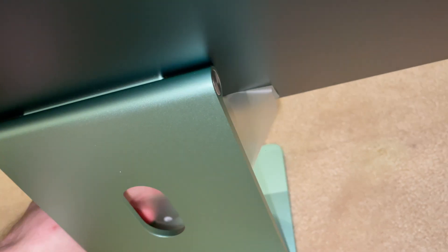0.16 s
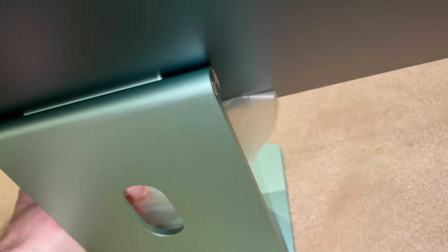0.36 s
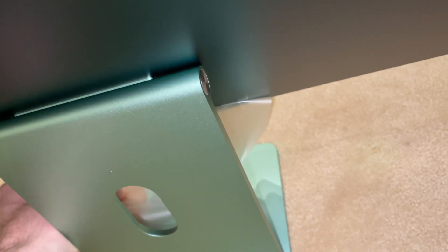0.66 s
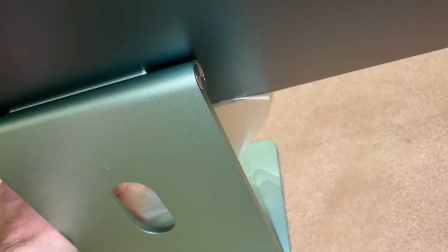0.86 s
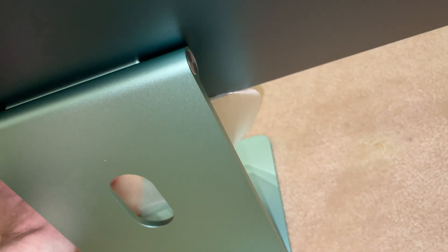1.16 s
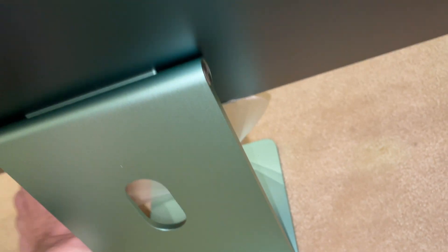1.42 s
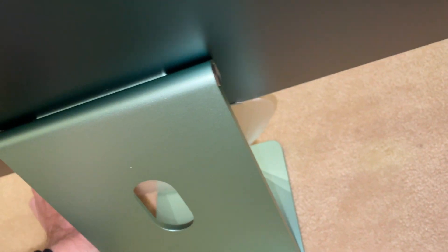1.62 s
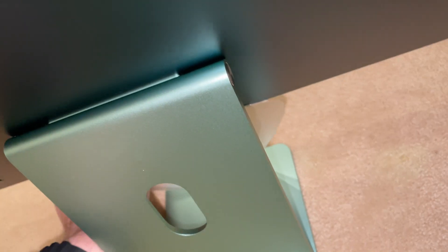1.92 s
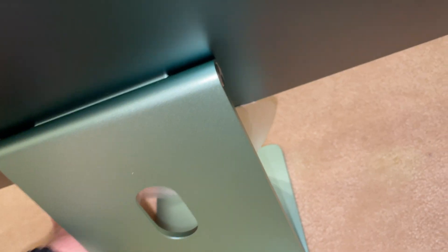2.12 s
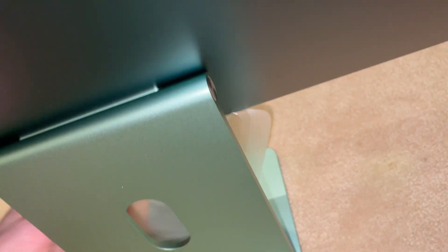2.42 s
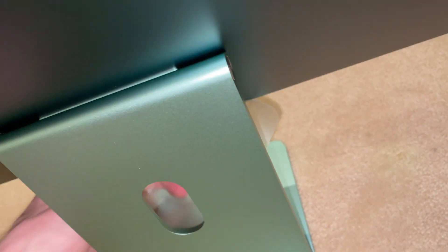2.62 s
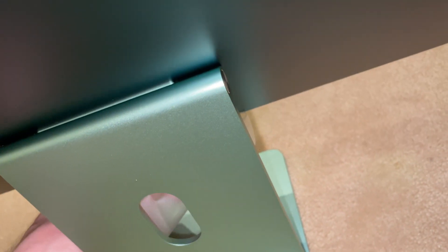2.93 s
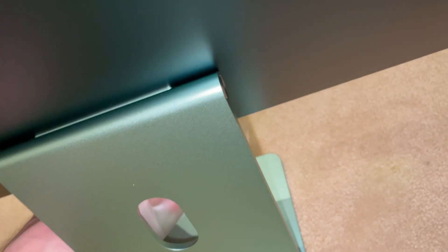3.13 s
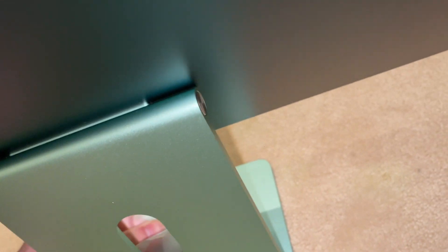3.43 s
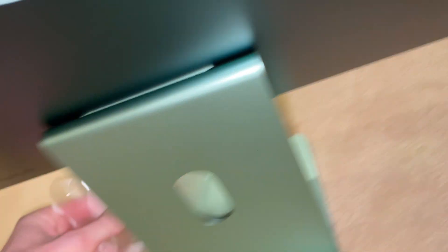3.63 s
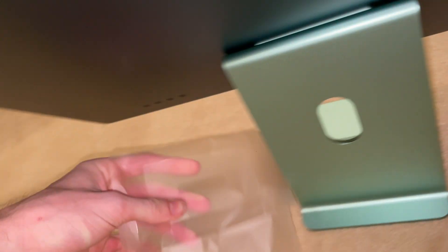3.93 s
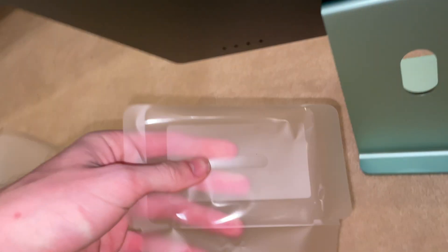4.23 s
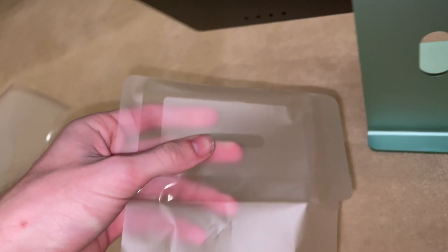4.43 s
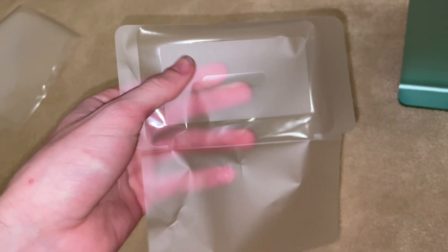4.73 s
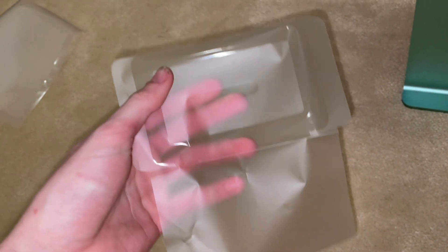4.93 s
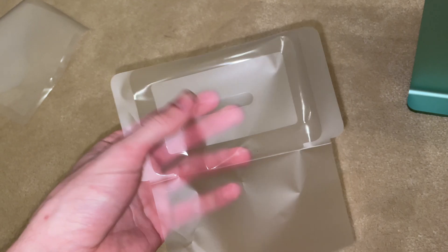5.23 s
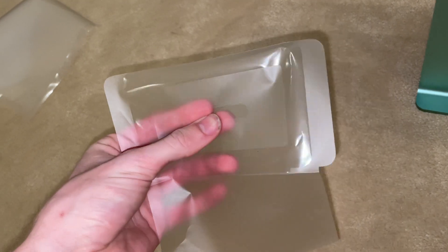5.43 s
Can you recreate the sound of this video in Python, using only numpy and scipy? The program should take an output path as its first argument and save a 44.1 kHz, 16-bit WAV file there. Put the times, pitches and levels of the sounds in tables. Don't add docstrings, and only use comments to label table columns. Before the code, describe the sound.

Very close stereo pickup in a quiet indoor room: stiff thin plastic film is worked off a metal stand by hand. Brittle snaps, fine crackle and hollow buckling pops come in uneven clusters, with soft low thuds from the tugged stand. The peel intensifies after two and a half seconds, peaks as the film rips free just after three, then thins to light crinkles and near silence, with a few late ticks.

```python
import sys
import numpy as np
from scipy import signal
from scipy.fft import rfft, irfft, next_fast_len
from scipy.io import wavfile

SR = 44100
rng = np.random.default_rng(int(sys.argv[2]) if len(sys.argv) > 2 else 0)


def materialize(psi):
    bounded = np.clip(np.atleast_2d(psi).T, -1, 1)
    quanta = np.round(bounded * 32767).astype(np.int16)
    wavfile.write(sys.argv[1], SR, quanta)


def voltage_ratio(level):
    return 10 ** (np.asarray(level, float) / 20)


N = 245195
SIZE = next_fast_len(N + SR // 2)
HZ = np.arange(SIZE // 2 + 1) * SR / SIZE
SECONDS = np.arange(N) / SR
RELEASE_S = 3.168

# start_s [s], peak_db [dB], top_share_db [dB], ring_hz [Hz]
SNAPS = [(0.0838, -26, -12.5, 3270), (0.1172, -22.5, -3, 3420), (0.1213, -19, 4, 2760),
         (0.1307, -22, 3, 3600), (0.147, -21.5, 4, 3720), (0.2112, -29, 3, 3450), (0.2468, -25.5, 1, 6100),
         (0.5231, -28.5, 1, 2400), (0.6277, -25.5, -19, 4440), (0.6721, -29.5, -6, 2120),
         (0.8476, -36, -33, 2420), (1.1645, -23, -5, 5900), (1.347, -25.5, 8.5, 6670),
         (1.3955, -39, 6.5, 7200), (1.409, -30.5, -3.5, 2280), (1.7163, -41, -17, 2010),
         (1.845, -22, -5.5, 2500), (1.9052, -12.5, 0, 4320), (2.0315, -30.5, 2.5, 3180),
         (2.0555, -26.5, 0, 4800), (1.184, -41, -37, 2070), (2.097, -38, 7, 1930),
         (2.1414, -25.5, -1, 2450), (2.1485, -22.5, -2, 3950), (2.1668, -15, 6, 3800),
         (2.2088, -26, -4, 3400), (2.2931, -32.5, -25, 3700), (2.3153, -24, -11.5, 3780),
         (2.486, -28.5, -28, 2570), (1.4917, -50, -38, 2350)]
# start_s [s], peak_db [dB], top_share_db [dB], ring_hz [Hz]
RIPS = [(2.5437, -29, -0.5, 3117), (2.6, -32.5, -12.5, 4300), (2.572, -29.5, 3.5, 2474),
        (2.5966, -14.5, -6.5, 3700), (2.628, -26.5, -19, 2520), (2.64, -20.5, 2, 6580),
        (2.652, -21, -7, 5590), (2.657, -14.5, -1, 3295), (2.6653, -16, 1.5, 7420),
        (2.677, -19, -2.5, 2900), (2.7133, -25, 1, 3100), (2.7244, -27, -11.5, 3064),
        (2.738, -26.5, -6.5, 2394), (2.7703, -20, 8, 5500), (2.9351, -17, 4, 2494),
        (2.9848, -14.5, -7, 3033), (3.1197, -22.5, -2, 3120), (3.1351, -8.5, 0, 1918),
        (3.1583, -13, 3.5, 3010), (3.1724, -13, -12.5, 4300), (3.1846, -23.5, -16, 5138),
        (3.235, -33, -7.5, 3300), (3.248, -27.5, -4.5, 3172), (3.2684, -29.5, -15, 3270),
        (3.3036, -36.5, -19.5, 2492), (3.336, -35, -3, 3270), (3.36, -33, -6, 2140),
        (2.61, -37.5, -12.5, 5240), (2.758, -25, -16.5, 2514), (3.2004, -31, -13, 3800)]
# start_s [s], peak_db [dB], top_share_db [dB], ring_hz [Hz]
TICKS = [(3.4412, -28.5, -6, 3700), (3.48, -33.5, -33.5, 1840), (3.501, -22.5, -3.5, 2830),
         (3.527, -26.5, -21.5, 3500), (3.5527, -26.5, -1, 2280), (3.6005, -23, -1, 2240),
         (3.626, -30.5, -17.5, 4430), (3.665, -27, -13, 4800), (3.6991, -33, -37, 4000),
         (3.762, -37.5, -18, 3650), (3.8823, -29, -2, 6440), (4.0636, -14.5, -4, 6530),
         (4.178, -49, -3.5, 2760), (4.361, -50, -21, 2195), (4.47, -56, -8.5, 6530),
         (4.5549, -47, -35, 2080), (5.2253, -48, -20, 2280), (5.2704, -49.5, -42, 1417),
         (5.3203, -24.5, -23.5, 4280), (5.3567, -18.5, 1, 3860), (5.4716, -43, -9, 4500),
         (4.335, -46, -39, 2403), (4.965, -69.5, -22, 1800), (5.095, -70, -16, 2080),
         (5.18, -64.5, -25, 2600), (3.587, -29, -5.5, 2010), (3.68, -40, -6, 6400),
         (3.5372, -31, -28.5, 2520)]
# pitch_hz [Hz], level_db [dB per Hz]
FILM = [(800, -23), (1300, 4), (1900, 0.5), (2500, 1), (3800, 0), (4600, -2), (6800, -2), (8300, -6),
        (11500, -8), (13500, -12), (15500, -17.5), (16700, -28.5)]


def rms_one(x):
    return x / np.sqrt(np.mean(x ** 2) + 1e-20)


def colour(x, points):
    hz, db = np.transpose(points)
    log_gain = np.interp(np.log(HZ + 1), np.log(hz), db) * np.log(10) / 20
    cepstrum = irfft(log_gain, SIZE)
    cepstrum[1:SIZE // 2] *= 2
    cepstrum[SIZE // 2 + 1:] = 0
    return irfft(rfft(x, SIZE) * np.exp(rfft(cepstrum)), SIZE)[..., :N]


def drift(rate_hz):
    r = np.exp(-80 * np.pi * rate_hz / SR)
    slow = signal.lfilter([1], [1, -2 * r, r * r], rng.standard_normal(N // 40 + 2002))[2000:]
    return np.interp(np.arange(N) / 40, np.arange(len(slow)), rms_one(slow))


def resonate(x, hz, width_hz):
    r = np.exp(-np.pi * width_hz / SR)
    zeros = np.array([1, 0, -1]) * (1 - r * r) / 2
    return signal.lfilter(zeros, [1, -2 * r * np.cos(2 * np.pi * hz / SR), r * r], x)


def grains(per_s, spread_db, t60_s):
    size_db = spread_db * np.minimum(rng.exponential(1, N), 4)
    impulses = voltage_ratio(size_db) * (rng.random(N) < per_s / SR)
    envelope = signal.lfilter([1], [1, -voltage_ratio(-60 / (t60_s * SR))], impulses)
    return rms_one(envelope * rng.standard_normal(N))


def add(out, s, x):
    i = max(round(s * SR), 0)
    out[i:i + len(x)] += x[:N - i]


def split(x):
    return [signal.sosfilt(signal.butter(4, 7900, kind, fs=SR, output="sos"), x) for kind in ("low", "high")]


def patchy(x, patchy_db):
    edges = 700 * 2 ** np.arange(0, 4.6, .5)
    out = x
    for edge in zip(edges, edges[1:]):
        band = signal.sosfilt(signal.butter(2, edge, "band", fs=SR, output="sos"), x)
        out = out + band * (voltage_ratio(patchy_db * drift(3.0)) - 1)
    return out


def between(low, high):
    return np.clip(np.minimum(HZ - low, high - HZ) / 150 + .5, 0, 1)


def still_room():
    room = [(25, -23), (50, -5), (90, -5.5), (160, -19.5), (300, -24.5), (1000, -40), (16000, -52.5)]
    return voltage_ratio(-66) * rms_one(colour(rng.standard_normal(N), room))


def thuds():
    # start_s [s], peak_db [dB], ring_hz [Hz]
    tugs = [(0.118, -20, 149.5), (0.126, -24.5, 117), (0.26, -28.5, 102.5), (0.349, -30.5, 172),
            (0.468, -28, 78), (0.524, -28, 187), (0.675, -21, 201), (1.059, -43, 118), (1.359, -29.5, 84.6),
            (1.501, -36.5, 86.5), (1.5, -26, 164), (1.729, -31.5, 165), (1.733, -27.5, 91),
            (1.915, -27.5, 105), (2.145, -19, 81), (2.176, -22.5, 180), (2.579, -29, 182),
            (2.633, -19.5, 180), (2.663, -23, 181), (2.835, -29, 176), (2.94, -17.5, 228),
            (3.135, -11.5, 260), (3.161, -10, 373), (3.166, -11.5, 175), (3.173, -17, 98.5),
            (3.669, -31.5, 200), (3.893, -42, 95.6), (4.075, -34.5, 119), (4.521, -45, 84),
            (0.689, -29.5, 195), (0.565, -41, 62), (0.53, -30, 96), (2.611, -37, 60), (2.161, -27, 63.5),
            (0.011, -39, 98), (0.147, -27.5, 150), (1.353, -33.5, 170), (2.315, -32.5, 95),
            (3.143, -17, 130), (3.363, -32, 188), (3.488, -37, 165), (5.073, -51.5, 86.5), (1.33, -34, 109),
            (1.655, -41, 98), (2.097, -26, 138)]
    # peak_db [dB], ring_hz [Hz], t60_s [s]
    release = (-26, 55, .62)
    cycles_to_die = 9.6
    out, t = np.zeros(N), np.arange(SR // 2) / SR
    blows = [(s, db, hz, cycles_to_die / hz) for s, db, hz in tugs]
    for s, db, hz, t60 in blows + [(RELEASE_S, *release)]:
        cycles = hz * t + 0.099 * (1 - np.exp(-t * hz / 0.72))
        swell = 1 - np.exp(-t * hz / 0.13)
        x = np.sin(2 * np.pi * cycles) * voltage_ratio(-60 * t / t60) * swell
        add(out, s, voltage_ratio(db - 1.5) * x / np.abs(x).max())
    return out


def drag():
    # start_s [s], end_s [s], level_db [dB], ring_hz [Hz], width_hz [Hz]
    drags = [
        (2.995, 3.115, -39.5, 630, 790),
        (4.66, 4.83, -69.5, 2100, 500),
        (4.71, 4.81, -65, 4500, 700),
        (4.72, 4.81, -62.5, 5900, 1000),
        (4.48, 4.53, -63.5, 2800, 1400),
        (0.75, 1.1, -65, 2800, 300),
        (3.02, 3.03, -39, 900, 600),
        (3.235, 3.285, -45, 3200, 1300),
        (3.77, 3.84, -51, 11800, 2500),
    ]
    noise, out = rng.standard_normal(N), 0
    for start, end, db, hz, width_hz in drags:
        contact = np.clip(np.minimum(SECONDS - start, end - SECONDS) * 50 + .2, 0, 1)
        tone = resonate(resonate(noise, hz, width_hz), hz, width_hz)
        out = out + voltage_ratio(db) * contact * rms_one(tone)
    return out


def hand():
    # start_s [s], held_s [s], slide_db [dB], glide_smoothness_db
    # [dB], flex_db [dB]
    moves = [(0, 0.0046, -54.5, 7, -42.5), (.11, 0.028, -41, -5.5, -40.5), (.05, 0.024, -60.5, 8, -68),
             (.22, 0.076, -60.5, 2.5, -50.5), (.31, 0.072, -62, 6, -51.5), (.39, 0.039, -57.5, 6.5, -45.5),
             (.5, 0.061, -61.5, 7, -48.5), (0.661, 0.064, -63.5, -5.5, -50), (0.76, 0.11, -59, -8, -49),
             (.83, 0.11, -52.5, -6, -51.5), (.96, .07, -56.5, -3.5, -56.5), (1.05, 0.14, -59, -10, -48),
             (1.31, 0.11, -57, -1.5, -46), (1.4, 0.056, -53.5, 0, -51), (1.47, 0.045, -65.5, -4, -45),
             (1.55, 0.02, -70, -6, -46.5), (1.69, 0.054, -57.5, -2.5, -42.5), (1.77, 0.13, -61.5, 0.5, -46),
             (1.918, 0.031, -51.5, 3.5, -43), (2.042, .2, -47, -1.5, -37.5),
             (2.29, 0.038, -52.5, -1, -41.5), (2.385, 0.026, -52, 7, -47.5), (2.45, 0.12, -53, -0.5, -48.5),
             (2.552, 0.19, -38.5, 0.5, -33), (2.8, 0.12, -52, -4, -47), (2.97, 0.043, -49.5, -3.5, -36),
             (3.132, 0.082, -42, -5, -32), (3.235, 0.027, -46, -2, -38), (3.308, 0.03, -43, -7, -38.5),
             (3.46, 0.091, -44, -0.5, -46.5), (3.61, 0.092, -47, 6.5, -45), (3.745, 0.029, -46, 6.5, -45.5),
             (3.79, 0.032, -52.5, 15, -41.5), (3.85, 0.022, -47, 2, -44.5), (3.9, 0.016, -53.5, 1.5, -47.5),
             (3.99, 0.045, -59.5, 4, -70),
             (4.059, 0.074, -55.5, -3, -47.5), (4.2, 0.19, -68, -2.5, -57.5),
                (4.47, 0.12, -63.5, -1.5, -55.5), (4.66, 0.039, -63, -8.5, -66),
                (4.72, 0.063, -63, 1, -69.5), (5.43, .03, -71.5, -6.5, -76.5),
                (5.221, 0.05, -73, -13, -65.5), (5.298, 0.017, -63, -2, -65),
                (5.37, 0.025, -62, -3.5, -55.5), (5.478, 0.09, -56.5, 1, -62.5)]
    rise_db_per_s, fall_db_per_s = 302.5, 197
    glide_stop_db_per_s, glide_quicker = 330, 2.6
    grip_slide_db, grip_flex_db, let_go_s = -73, -62.5, 4.3
    stand_held_db, stand_free_db = -50, -52.5
    stand_follows = 0.63

    t = np.arange(0, N, 32) / SR
    start, held, slide_db, glide_db, flex_db = np.transpose(moves)[:, :, None]
    rise_db = -rise_db_per_s * np.maximum(start - t, 0)
    since = np.maximum(t - start - held, 0)
    glides = glide_quicker * rise_db - glide_stop_db_per_s * since
    flexes = rise_db - fall_db_per_s * since
    grip_db = -fall_db_per_s * np.maximum(t - let_go_s, 0)

    def total_db(db, rest_db):
        power = np.sum(voltage_ratio(2 * db), axis=0) + voltage_ratio(2 * (rest_db + grip_db)) + 1e-12
        return np.interp(SECONDS, t, 10 * np.log10(power))

    slide = total_db(slide_db + glides, grip_slide_db)
    fine = total_db(slide_db + glide_db + glides, grip_slide_db - 12.5)
    flex = total_db(flex_db + flexes, grip_flex_db)
    stand_db = np.where(SECONDS < RELEASE_S, stand_held_db, stand_free_db)
    return slide, fine, flex, stand_db + stand_follows * (flex + 45)


def rustle(slide_db, fine_db, flex_db, rock_db):
    # pitch_hz [Hz], level_db [dB per Hz]
    sheet = [(150, -43), (280, -3), (400, -0.5), (650, 0.5), (1000, -5.5), (1500, -10.5), (2600, -13),
             (5000, -27)]
    # ring_hz [Hz], width_hz [Hz], level_db [dB]
    stand = [(54.3, 8, -6), (91, 41, 2), (180, 22, -2), (201, 20, -1.5)]
    hiss = rng.standard_normal(N) * voltage_ratio(1.2 * drift(30))
    crackle = voltage_ratio(0.31 * (slide_db + 44.0))
    crackles = crackle * grains(400 * voltage_ratio(6 * drift(10)), 4.2, .002)
    slide, fine = split(colour(hiss + crackles, FILM))
    pops = grains(120 * voltage_ratio(4 * drift(9)), 1.8, .012)
    flex = colour(1.2 * rng.standard_normal(N) + pops, sheet)

    shake = rng.standard_normal(N) * voltage_ratio(4.0 * drift(34) + 3.0 * drift(4.5))
    rock = np.zeros(N)
    for k, (hz, width, db) in enumerate(stand):
        rock += (-1) ** k * voltage_ratio(db) / np.sqrt(width) * resonate(shake, hz, width)

    upper = signal.sosfilt(signal.butter(2, 4200, "high", fs=SR, output="sos"), slide)
    slide = slide + upper * (voltage_ratio(0.55 * (fine_db - slide_db)) - 1)
    film = voltage_ratio(slide_db + 1.0) * rms_one(patchy(slide, patchy_db=2.1)) + voltage_ratio(fine_db - 7.5) * rms_one(fine)
    return film + voltage_ratio(flex_db - 6.5) * rms_one(flex) + voltage_ratio(rock_db + 1.5) * rms_one(rock)


def knocks():
    # start_s [s], peak_db [dB],
    # ring_hz [Hz]
    whole = [(0.124, -34, 313), (0.148, -32, 1340), (0.251, -29, 622), (0.464, -32, 564), (0.526, -20, 605),
             (0.671, -21.5, 453), (1.288, -38.5, 650), (1.347, -24.5, 558), (1.4925, -30.5, 805),
             (1.844, -25, 734), (1.904, -19.5, 923), (2.069, -18.5, 566), (2.097, -18, 1083),
             (2.168, -28.5, 416), (2.486, -27, 580), (2.562, -20, 604), (2.6275, -24, 750),
             (2.634, -21.5, 332), (2.6645, -8, 587), (2.7905, -19, 482), (2.935, -10.5, 637),
             (2.983, -23.5, 350), (3.1185, -21.5, 940), (3.1345, -9, 1450), (3.158, -10, 762),
             (3.279, -24.5, 1160), (3.335, -26.5, 1100), (2.055, -22.5, 663), (2.21, -26, 375),
             (2.313, -31, 725),
             (3.537, -24.5, 1520), (3.588, -34.5, 414), (3.666, -33, 370), (3.76, -29.5, 876),
             (4.03, -38, 830), (4.062, -33, 344), (4.554, -39, 578.5), (5.319, -51, 792),
             (5.345, -35.5, 618), (5.355, -31.5, 344), (5.471, -39, 590), (3.875, -40.5, 700),
             (4.246, -48.5, 501), (4.055, -35, 930),
             (0.122, -23.5, 850), (0.21, -32.5, 378), (0.349, -39.5, 337.5), (0.399, -38.5, 590),
                    (3.132, -10.5, 800), (0.816, -42.5, 670), (1.047, -44, 370), (1.186, -41, 686),
                    (1.395, -42.5, 490), (2.6395, -14, 616), (3.1715, -20, 520), (1.719, -34.5, 686),
                    (1.878, -42, 635), (2.045, -35, 910), (2.077, -25, 500), (2.113, -30, 396.7),
                    (2.454, -39.5, 500), (2.55, -32, 803), (2.712, -20.5, 1100), (2.834, -35, 420),
                    (2.87, -34.5, 699), (3.199, -26.5, 1203), (3.251, -28.5, 1500), (3.304, -32.5, 1055),
                    (3.456, -39.5, 1110), (3.479, -37.5, 500), (3.626, -36.5, 440), (4.797, -59, 397),
                    (5.091, -66, 588), (5.183, -63, 587), (5.367, -38, 684), (5.521, -50, 355),
                    (3.163, -11, 640), (2.657, -25, 900)]
    out, t = np.zeros(N), np.arange(SR // 10) / SR
    buckles = whole
    for s, db, *_ in [*SNAPS, *RIPS, *TICKS]:
        buckles.append((s, db - 11, 350 * 2 ** (2 * rng.random())))
    for s, db, hz in buckles:
        phase, puff_pitch = rng.random(2)
        cycles = t * hz
        ring = np.sin(2 * np.pi * cycles) * voltage_ratio(-60 * cycles / 17.6) * np.minimum(cycles / 0.41, 1)
        sweep = np.sin(2 * np.pi * (1.582 * np.sqrt(cycles) + .25 * cycles + phase))
        sweep = sweep * voltage_ratio(-60 * cycles / 24.5) * np.minimum(cycles / 0.031, 1)
        puff = resonate(rng.standard_normal(len(t)), hz * (0.3 + puff_pitch), 0.99 * hz)
        puff = rms_one(puff) * voltage_ratio(-60 * t / 0.033)
        x = ring + voltage_ratio(-5.5) * sweep + voltage_ratio(-7.5) * puff
        add(out, s, voltage_ratio(db + 2.0) * x / np.abs(x).max())
    return out


def snaps():
    # start_s [s], peak_db [dB], top_share_db
    # [dB], ring_hz [Hz]
    creaks = [(0.1078, -43.5, -10, 3600), (0.3058, -46, -15, 3600), (0.4904, -48.5, -2, 2360),
              (0.5148, -40, -9, 2500), (0.795, -43.5, -6, 3830), (1.165, -25, -22.5, 2500),
              (1.2198, -45.5, -34, 2000), (2.7402, -29, -12, 1500), (1.3205, -41, -21, 3100),
              (1.339, -37, -15.5, 2380), (1.36, -40, -8, 2300), (1.372, -44, 3, 3000),
              (1.8603, -42, -13, 4500), (2.0675, -37.5, 0, 2600), (2.1337, -38.5, -10.5, 3700),
              (2.138, -32, -9.5, 6000), (2.171, -28, -3, 3020), (2.1752, -25, -5, 5000),
              (2.2324, -40, 2, 3700), (2.3078, -36.5, -3, 4500), (2.4533, -41, -15, 2290),
              (2.459, -36, -12.5, 1886), (2.521, -40, -4.5, 6420), (2.6693, -20.5, 0, 4200),
              (2.7123, -30, -3.5, 2990), (2.7415, -35, -10, 2500), (2.79, -27, -3, 3600),
              (2.871, -36, -24, 2500), (2.9608, -41, 6, 5000), (3.1188, -26, -6.5, 3084),
              (3.1273, -23.5, -4.5, 2720), (3.1328, -14, -6, 6500), (3.1392, -16, -3.5, 3487),
              (3.1614, -10.5, 2, 3700), (3.1668, -19, 0.5, 4480), (3.2515, -27.5, -9.5, 1700),
              (3.281, -34.5, -18.5, 3200), (3.4624, -42.5, -29, 1600), (3.632, -35.5, -15.5, 2990),
              (3.879, -36, 7, 5660), (3.875, -35, 7, 5960), (3.884, -48, -2, 6440), (4.03, -49, -10, 2304),
              (4.0392, -45, -1.5, 2997), (4.326, -54, -23, 4500), (4.591, -48.5, -18.5, 2170),
              (4.266, -54.5, -15, 3520), (5.3455, -56, -22, 2000)]
    out, t = np.zeros(N), np.arange(SR // 14) / SR - .008
    instant = np.abs(t) == np.abs(t).min()
    soft = signal.butter(6, 7000, fs=SR, output="sos")
    for s, db, top_db, hz in [*SNAPS, *RIPS, *TICKS, *creaks]:
        a, b = rng.random(2)
        late = t - .0015 - 0.0027 * a
        after = voltage_ratio(-60 * t / (0.0073 * voltage_ratio(0.12 * db))) + voltage_ratio(-26.5 - 60 * np.abs(late) / .008) * (late > 0)
        before = voltage_ratio(60 * t / 0.0046) + voltage_ratio(-29 + 60 * t / 0.094)
        crack = rng.standard_normal(len(t)) + 5.03 * np.sign(b - .5) * instant
        crack = crack + 2.2 * resonate(crack, hz, 290) + 0.26 * resonate(crack, 2400 * 5 ** b, 1200)
        body, top = split(crack)
        dull = np.exp(-2 * np.pi * 14000 * voltage_ratio(min(top_db, 0)) / SR)
        body = signal.lfilter([1], [1, -dull], body)
        tail = signal.sosfilt(soft, body) * voltage_ratio(-28.5 - 60 * t / 0.18) * (t > 0)
        body = body * np.where(t > 0, after, before) + tail
        top = top * np.where(t > 0, after, before ** 2.1)
        x = body / np.abs(body).max() + voltage_ratio(top_db + 10.0) * top / np.abs(top).max()
        add(out, s + t[0], voltage_ratio(db + 8.5) * x)
    return colour(out, FILM)


def ports(x, gap_db, echo_t60):
    # pitch_hz [Hz], left_lead_rad [rad], left_minus_right_db [dB], likeness [0-1]
    pair = [(40, 0.47, -0.7, 0.92), (130, 0.13, 0.5, 0.95), (355, 0.57, 1.5, 0.97), (650, 0.68, 3.5, 1),
            (1100, 0.52, 9, 0.75), (1800, 2.5, -0.5, 0.7), (1900, 4, -1, 1), (2500, 8, 3.5, .9),
            (3700, 7, 0.5, 0.5), (5000, 8, 3, 0.2), (6680, 5, -0.5, 0.6), (8850, 3, 0, 0.6),
            (10154, 1, -1.5, 0.4), (12500, -1.2, 2.5, 1), (15000, -3, -12.5, 0.95)]
    loose_s, loose_loss, loose_hz = 3.42, 0.34, 1260
    hz, *columns = np.transpose(pair)
    lead, balance_db, alike = (np.interp(HZ, hz, c) for c in columns)
    alike = np.clip(alike, 0, 1)
    t, sides = np.arange(SR // 25) / SR, np.array([[.5], [-.5]])

    pose = np.abs((SECONDS * 5 - np.arange(6)[:, None] / 6) % 1 - .5)
    poses = rfft(x * np.sqrt(np.clip(1 - 6 * pose, 0, 1)), SIZE)
    echoes = rng.standard_normal((2, 6, len(t))) * voltage_ratio(-60 * t / echo_t60) * (t > .0006)
    echoes = rfft(echoes / np.sqrt(np.sum(echoes ** 2, axis=2, keepdims=True)), SIZE)
    direct = np.exp(1j * (sides * lead)) * rfft(x, SIZE)
    diffuse = np.sum(echoes * poses, axis=1)

    loose = 1 - loose_loss * np.minimum(HZ / loose_hz, 1) ** 2
    alike = alike * np.array([[np.ones_like(HZ)], [loose]])
    heard = (np.sqrt(alike) * direct + np.sqrt(1 - alike) * diffuse) * voltage_ratio(sides * balance_db)
    left, right = np.swapaxes(heard, 0, 1)

    mid = (left + right) / 2 * voltage_ratio(gap_db * (between(7550, 8900) + between(13900, 30000)))
    side = (left - right) / 2 * voltage_ratio(gap_db * between(10400, 12500))
    both = irfft(np.array([mid + side, mid - side]), SIZE)[..., :N]
    return np.where(SECONDS < loose_s, both[:, 0], both[:, 1])


def scene():
    impacts = snaps() + knocks() + thuds()
    friction = rustle(*hand()) + drag() + still_room()
    return ports(impacts, gap_db=-6.5, echo_t60=0.011) + ports(friction, gap_db=-41.0, echo_t60=0.041)


def band_limit(x):
    return signal.sosfilt(signal.butter(12, 16820, fs=SR, output="sos"), x)


def record(dry):
    steep = signal.butter(4, 42, "high", fs=SR, output="sos")
    rounded = .98 * np.tanh(signal.sosfilt(steep, dry) / .98)
    top_cut = signal.cheby2(10, 60, 17000, fs=SR, output="sos")
    return band_limit(signal.sosfilt(top_cut, rounded))


dry = scene()
out = record(dry)
materialize(out)
```